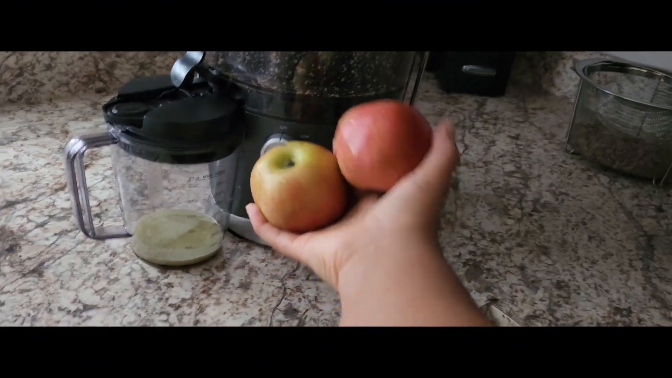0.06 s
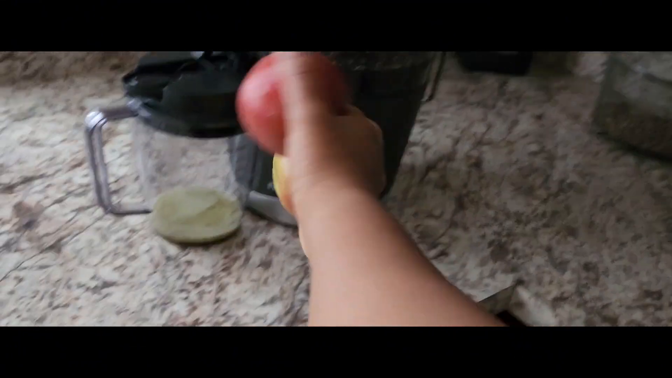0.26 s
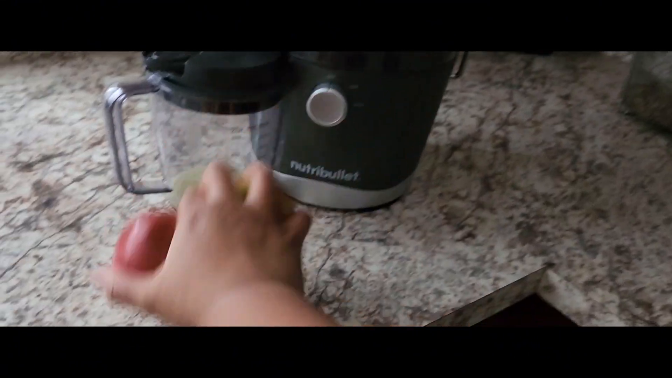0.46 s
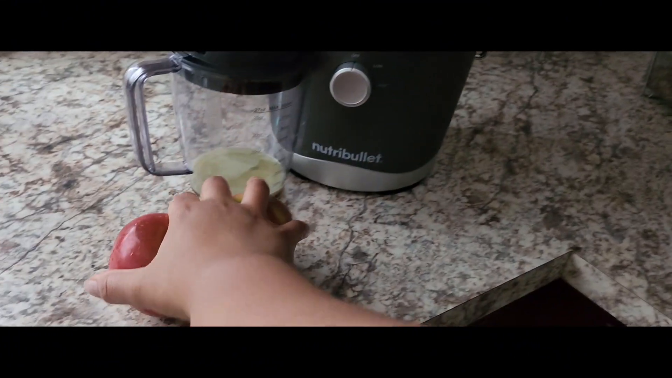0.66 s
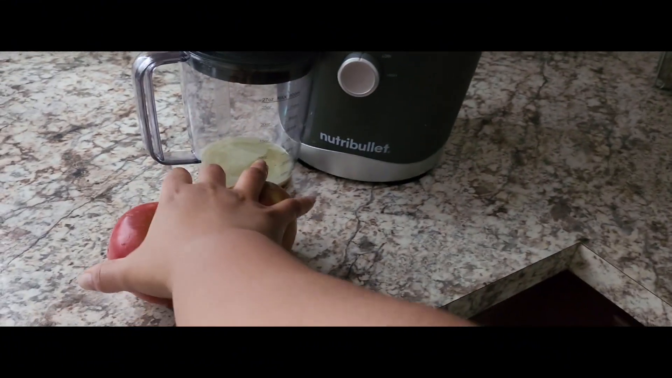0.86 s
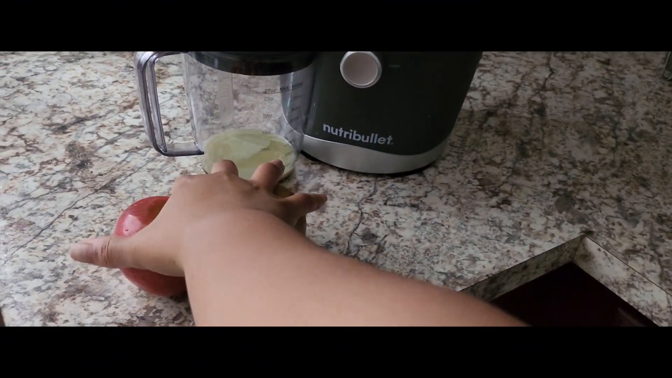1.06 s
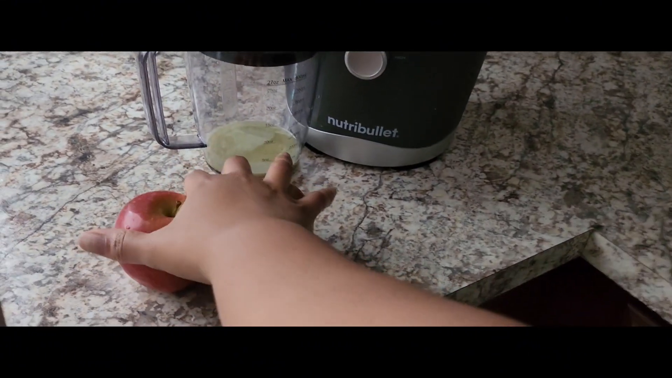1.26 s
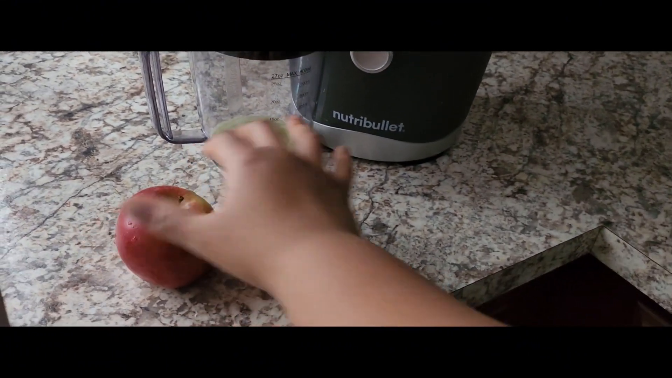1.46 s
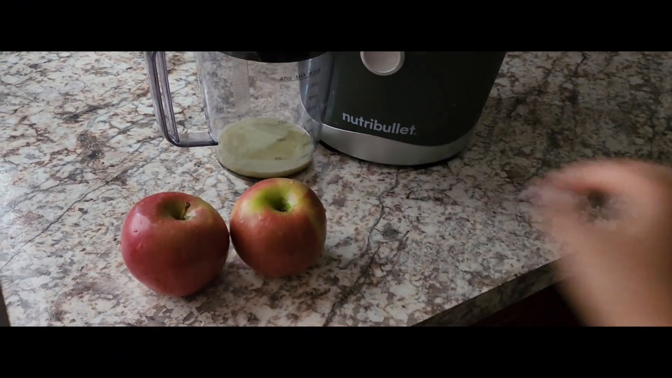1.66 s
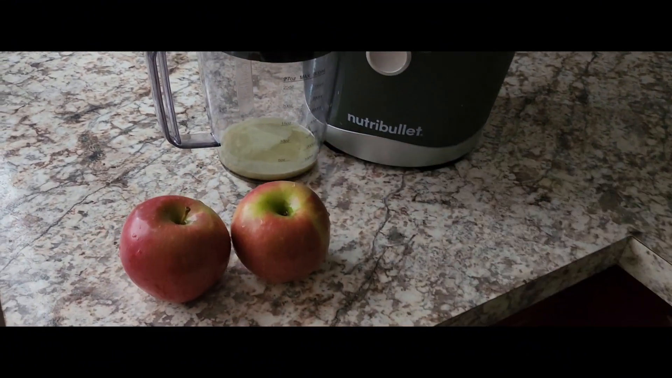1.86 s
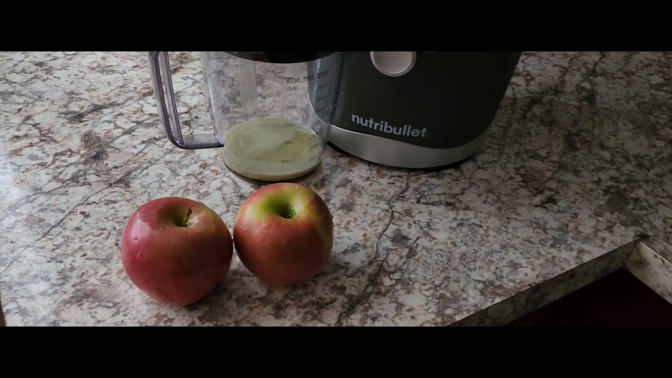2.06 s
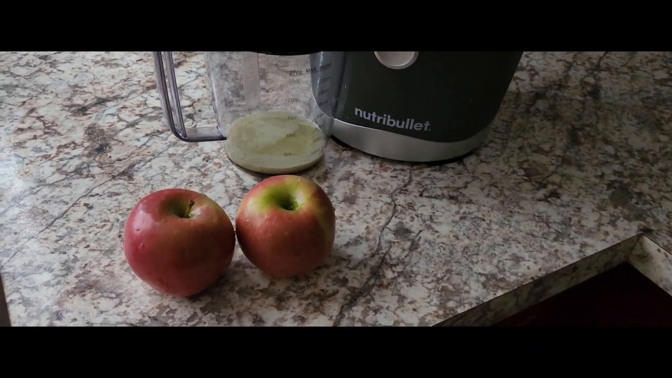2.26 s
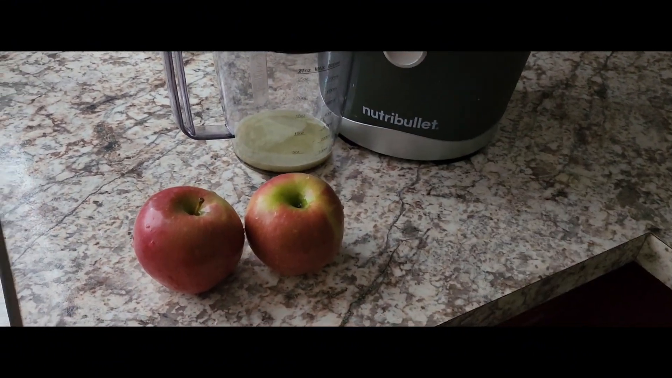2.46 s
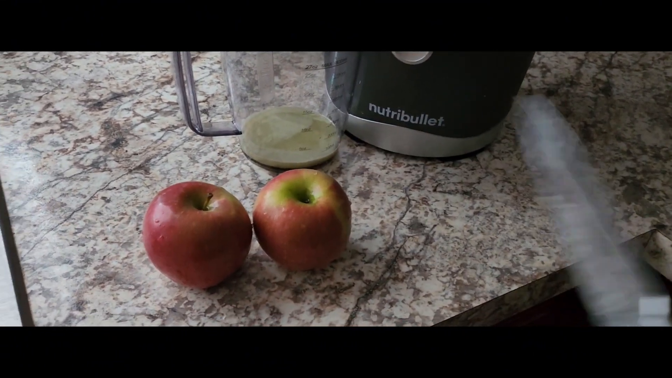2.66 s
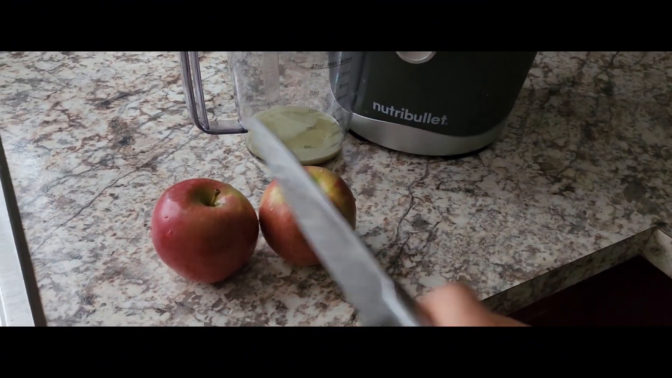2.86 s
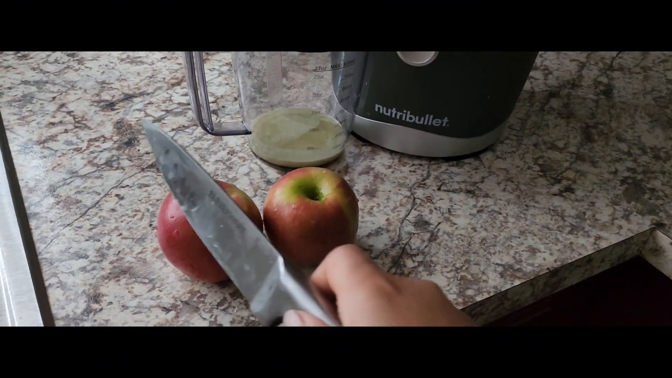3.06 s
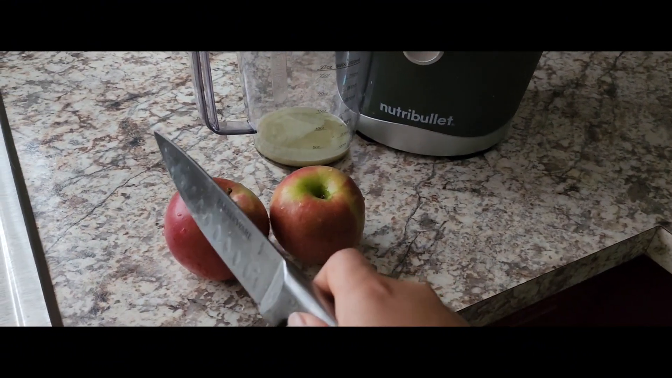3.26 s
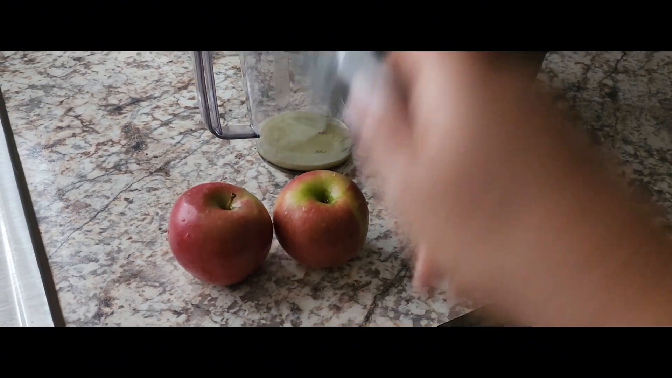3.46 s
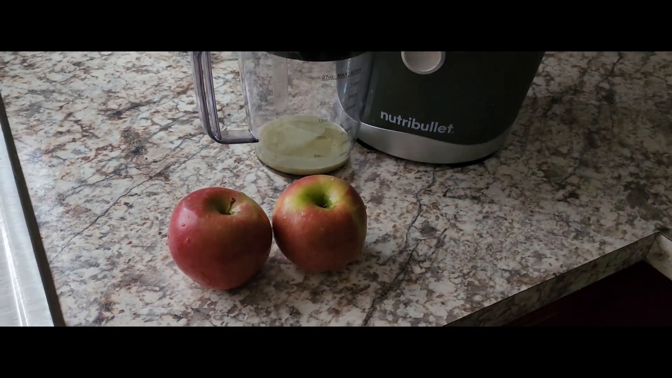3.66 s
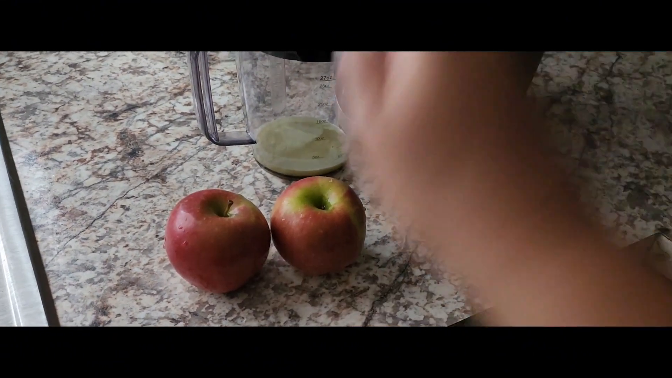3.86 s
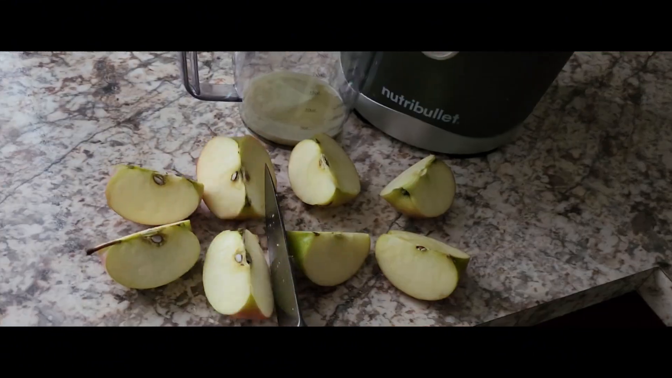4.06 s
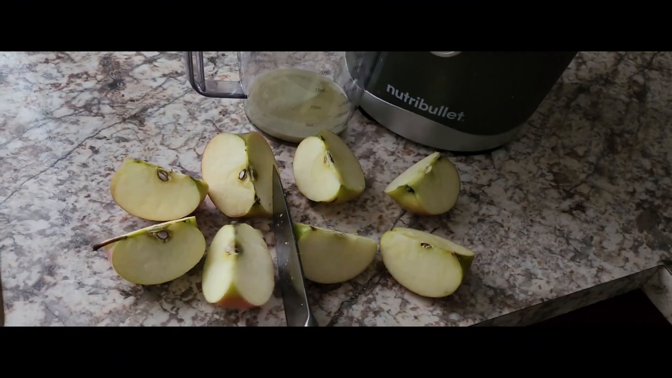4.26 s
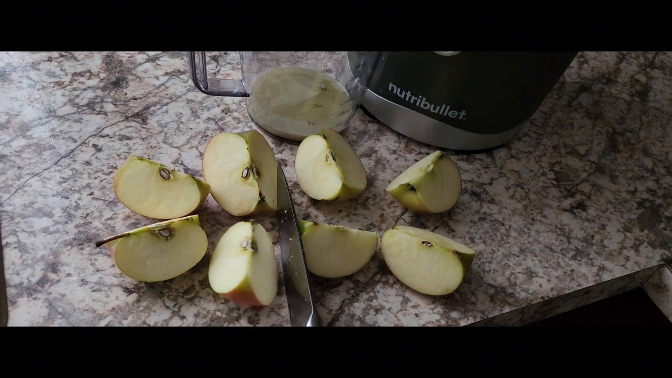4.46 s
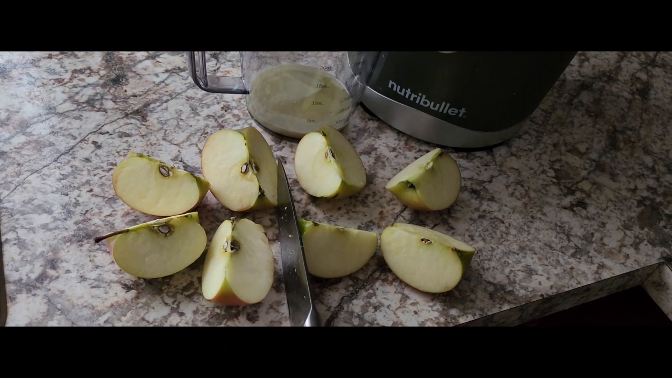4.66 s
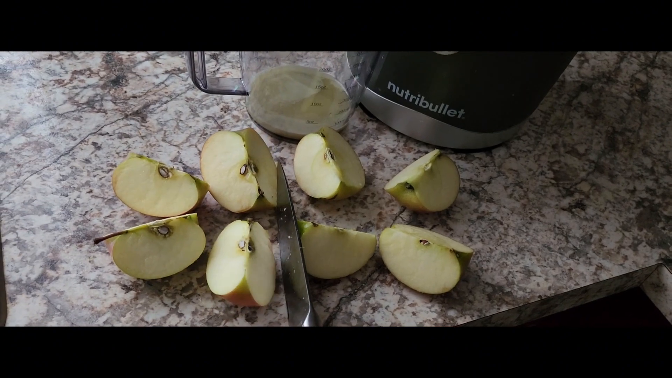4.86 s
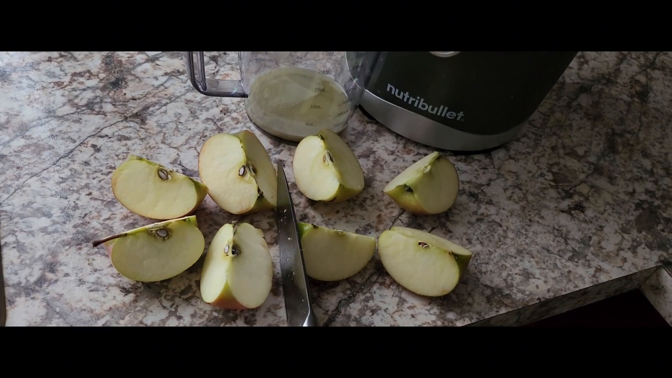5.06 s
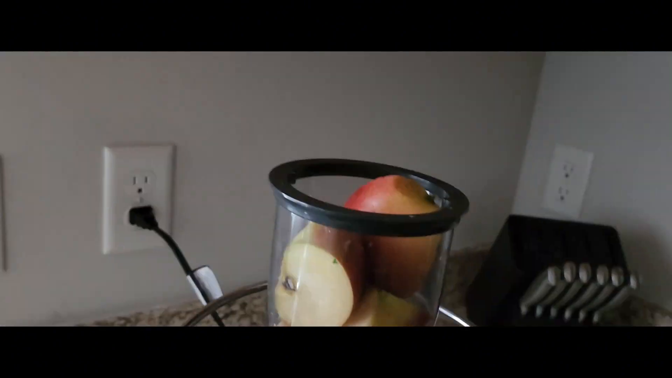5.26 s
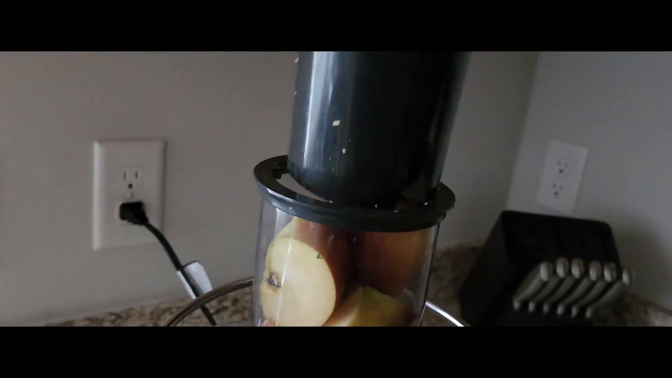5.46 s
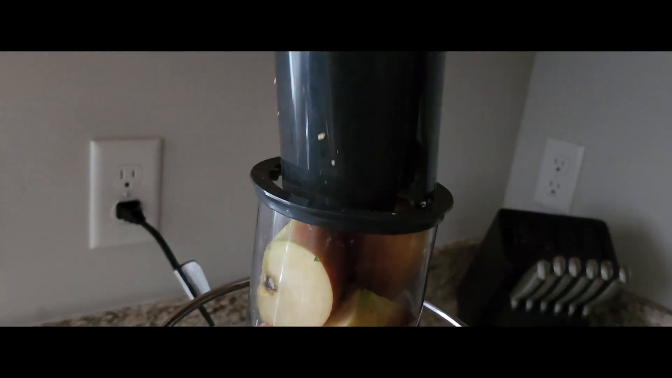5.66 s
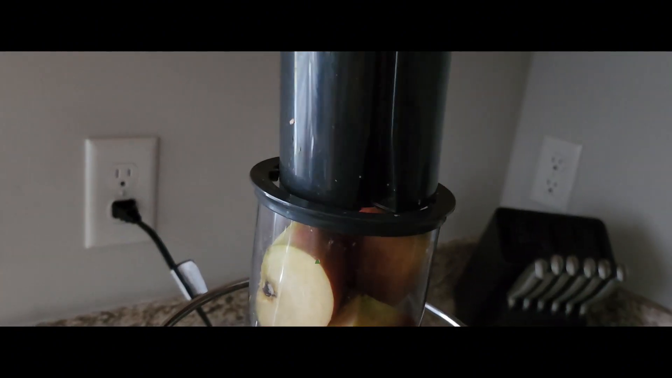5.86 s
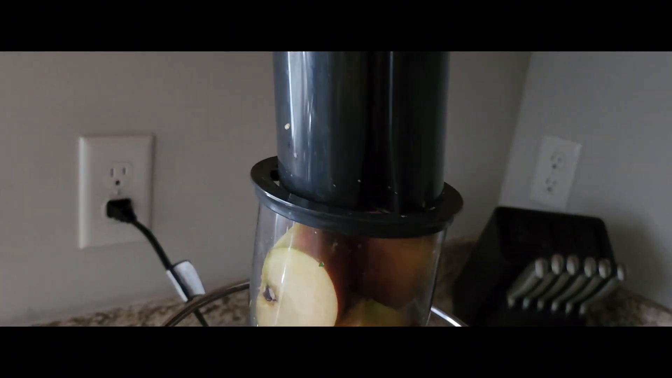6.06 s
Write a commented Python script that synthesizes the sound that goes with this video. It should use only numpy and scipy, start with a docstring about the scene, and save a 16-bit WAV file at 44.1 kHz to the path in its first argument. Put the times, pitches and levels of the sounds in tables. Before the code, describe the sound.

Close in a small, lively kitchen with low ventilation rumble, two apples land in a heavy, clustered thud that rattles a plastic jug. One rolls softly, with small finger taps. A knife scrapes out of a wooden block with a faint steel ring. After a pause a hard blow hits the counter, and the sound cuts abruptly to a loud juicer humming, whining and tearing apple.

```python
"""Ventilation rumbles under a faint hiss; two apples land on a stone counter and shake a plastic jug.
One rolls, a knife is drawn from its block, and a hard blow on the counter rings the room.
The scene then cuts to a running juicer: basket hum, motor whine, rushing air, apple on the grater.
Struck bodies are damped sines and decaying noise; friction and air are coloured noise;
the motor is sines locked to the shaft."""
import sys
import numpy as np
from scipy import signal
from scipy.fft import rfft, irfft
from scipy.io import wavfile
from scipy.ndimage import uniform_filter1d

SR = 44100
rng = np.random.default_rng(int(sys.argv[2]) if len(sys.argv) > 2 else 0)


def to_wav(sig):
    """Store sig (one row per channel, or 1-D mono) as 16-bit WAV at the path in sys.argv[1].

    Samples outside -1..1 are clipped; the rate is SR.
    """
    pcm = np.clip(np.atleast_2d(sig), -1, 1) * 32767
    pcm = np.round(pcm).astype(np.int16)
    wavfile.write(sys.argv[1], SR, pcm.T)  # frames by channels


N = 269451
T = np.arange(N) / SR
RING_T = T[:SR]  # one second, for decays and responses
JUICER_S = 5.206  # cut to the juicer


def undb(db):
    """Decibels to gain."""
    return 10 ** (np.asarray(db) / 20)


def unit(x):
    """Scale to rms 1."""
    return x / np.sqrt(np.mean(x ** 2))


def pan(db):
    """Left and right gains for a left-minus-right level in dB."""
    return undb(np.array([[db], [-db]]) / 2)


def on_log(hz, points):
    """Read (Hz, value) points on a logarithmic frequency axis."""
    f, value = np.transpose(points)
    return np.interp(np.log(hz + 1), np.log(f), value)


def convolve(x, response):
    """Pass a sound through a response, keeping its length."""
    return signal.fftconvolve(np.atleast_2d(x), np.atleast_2d(response), axes=1)[:, :x.shape[-1]]


def colour(x, points, size=8192):
    """Minimum-phase filter with the given spectrum; white noise keeps its power."""
    gain = unit(undb(on_log(np.fft.rfftfreq(size, 1 / SR), points)))
    # folding the cepstrum makes the response causal
    cepstrum = irfft(np.log(gain))
    cepstrum[1:size // 2] *= 2
    cepstrum[size // 2 + 1:] = 0
    return convolve(x, irfft(np.exp(rfft(cepstrum))))


def diffuse(size, apart_hz=680):
    """Stereo white noise: alike in the bass, unrelated in the treble."""
    alike = 1 / (1 + (np.fft.rfftfreq(size, 1 / SR) / apart_hz) ** 4)
    mid, side = rfft(rng.standard_normal((2, size)))
    mid = mid * np.sqrt((1 + alike) / 2)
    side = side * np.sqrt((1 - alike) / 2)
    return irfft(np.array([mid + side, mid - side]), size)


def wander(rate_hz):
    """Smoothed random steps with a spread near 1."""
    hold = max(int(SR / rate_hz), 2)
    steps = np.repeat(rng.standard_normal(N // hold + 1), hold)
    return unit(uniform_filter1d(steps, hold)[:N])


def fade(t60_s):
    """Exponential decay by 60 dB in t60_s seconds."""
    return np.exp(-np.log(1000) * RING_T / t60_s)


def swell(start_s, attack_s, hold_s, t60_s):
    """Envelope that rises linearly, holds and dies away exponentially."""
    rise = np.clip((T - start_s) / attack_s, 0, 1)
    released_s = np.maximum(T - start_s - attack_s - hold_s, 0)
    return rise * np.exp(-np.log(1000) * released_s / t60_s)


def ring(modes):
    """Damped sines of a struck body."""
    return sum(undb(db) * fade(t60_s) * np.sin(2 * np.pi * hz * RING_T) for hz, db, t60_s in modes)


def friction(grain_db, grain_hz):
    """Noise broken into tiny slips of uneven strength."""
    return unit(diffuse(N) * undb(grain_db * wander(grain_hz)))


def add(out, start_s, sound):
    """Mix a sound in at a time."""
    start = int(start_s * SR)
    out[:, start:start + sound.shape[-1]] += sound[..., :N - start]


# Blows on the counter. Each row: start in seconds, level in dB, contact low-pass in Hz, drive high-pass
# in Hz, gain of the counter modes in dB, left minus right in dB, jug clatter in dB, jug ringing
# relative to its clatter in dB.
BLOW_ROWS = [(0.5053, -5, 303, 30, 2, -2.5, -38, -12.5), (0.5126, -17, 1400, 26, -10.5, 7.5, -41, -8.5),
             (0.5169, -1.5, 135, 20, 5, 4.5, -35, -12), (0.527, -15, 1108, 30, -3.5, -2, -25.5, -3.5),
             (0.5352, -2.5, 181, 18, 0, -2.5, -22.5, -3.5), (3.9539, -23.5, 220, 80, -1, -4, -43.5, -15),
             (3.9987, -4, 1796, 120, -3, -3.5, -35.5, -29.5), (4.0096, -13, 2300, 400, -10, 0, -35, -27.5)]
# Modes of counter and cabinet. Each row: pitch in Hz, level in dB, t60 in seconds.
COUNTER_MODES = [(62.3, -28.5, 0.23), (104, -6.5, 0.12), (190, -12, 0.067), (299.6, -14.5, 0.4),
                 (373.2, -16, .22), (497.8, -13, 0.27), (680, -15.5, 0.15), (817, -10.5, 0.034),
                 (1180, -9, .05)]
# Spectrum of the slab's dense short-lived modes. Each row: frequency in Hz, relative level in dB.
SLAB_SPECTRUM = [(30, -20.5), (70, -7), (130, -3.5), (240, 4), (450, 4), (620, 1), (820, -2), (1100, -1),
                 (1450, -7), (2100, -15), (2500, -9.5), (3300, -13.5), (4500, -10), (8000, -13.5),
                 (16000, -5)]


def counter(slab_t60_s=0.13, push_db=21):
    """Blows push the slab and ring its modes; soft fruit passes only lows, a light blade few of them."""
    out = np.zeros((2, N))
    # alternating signs make neighbours swing against each other: little is left below the lowest
    modes = sum((-1) ** k * ring([mode]) for k, mode in enumerate(COUNTER_MODES))
    for start_s, db, contact_hz, lowest_hz, modes_db, pan_db, _, _ in BLOW_ROWS:
        slab = diffuse(SR) * fade(slab_t60_s)
        slab[:, 0] += undb(push_db)  # the push is one impulse
        body = undb(modes_db) * modes - colour(slab, SLAB_SPECTRUM)
        body = signal.lfilter(*signal.butter(1, lowest_hz, "high", fs=SR), body)
        contact = signal.butter(2, min(contact_hz, SR / 3), fs=SR)
        add(out, start_s, undb(db) * pan(pan_db) * signal.lfilter(*contact, body))
    return out


# Modes of the jug. Each row: pitch in Hz, level in dB, t60 in seconds.
JUG_MODES = [(1680, -13.5, 0.085), (2210, -26.5, .2), (2800, -13, 0.14), (2800, -9, 0.087),
             (4030, -13.5, 0.24), (4330, -34.5, 0.36), (5512, -17.5, 0.27), (5620, -17, 0.19),
             (11700, -11, 0.082)]
# Spectrum of the plastic clatter. Each row: frequency in Hz, relative level in dB.
CLATTER_SPECTRUM = [(40, -21), (300, -1.5), (600, 6.5), (1200, 4.5), (1900, 4), (3500, -5.5), (7000, -4.5),
                    (10000, -9), (12500, -3), (16000, -15)]


def jug(clatter_t60_s=0.15, detune=0.014, bounces=3):
    """Plastic chatters at every blow and bounces after the apples; each contact detunes the modes."""
    contacts = [(start_s, db, ring_db) for start_s, *_, db, ring_db in BLOW_ROWS]
    bounce_s, gap_s, gap_shrink = 0.566, 0.016, 0.58
    bounce_db, bounce_ring_db = -34, 6.5
    for k in range(bounces):
        contacts.append((bounce_s, bounce_db, bounce_ring_db))
        bounce_s += gap_s * gap_shrink ** k
    out = np.zeros((2, N))
    for start_s, db, ring_db in contacts:
        rings = []
        for chances in rng.standard_normal((2, len(JUG_MODES))):  # left, right
            loaded = [(hz * (1 + detune * chance), level_db, t60_s)
                      for (hz, level_db, t60_s), chance in zip(JUG_MODES, chances)]
            rings.append(ring(loaded))
        clatter = colour(diffuse(SR) * fade(clatter_t60_s), CLATTER_SPECTRUM)
        add(out, start_s, undb(db) * (clatter + undb(ring_db) * np.array(rings)))
    return out


# Spectrum of the apple on stone. Each row: frequency in Hz, relative level in dB.
ROLL_SPECTRUM = [(40, -33), (75, 3.5), (102, 6.5), (135, -4.5), (180, -8.5), (300, -16), (600, -28),
                 (2000, -46), (6000, -50.5), (9000, -60)]


def rolling_apple(level_db=-35):
    """An apple rolls under the hand: a swell of low noise."""
    envelope = swell(start_s=0.98, attack_s=0.045, hold_s=0.115, t60_s=0.22)
    return colour(undb(level_db) * envelope * diffuse(N), ROLL_SPECTRUM)


# Spectrum of palm on apple skin. Each row: frequency in Hz, relative level in dB.
SKIN_SPECTRUM = [(500, -12.5), (1800, 2), (3000, -2.5), (4900, -0.5), (5700, 3.5), (6800, -14.5),
                 (10000, -17), (14000, -7)]


def palm(level_db=-69.5):
    """The palm brushes the apple skins: a faint swell of noise with a slow release."""
    envelope = swell(start_s=1.1, attack_s=0.12, hold_s=0.29, t60_s=3.3)
    return colour(undb(level_db) * envelope * diffuse(N), SKIN_SPECTRUM)


# Pulls of the knife. Each row: start in seconds, hold in seconds, blade hiss in dB, wood in dB.
PULL_ROWS = [(1.881, 0.11, -48, -38), (1.932, 0.007, -45, -29.5), (2.102, 0.012, -59, -40.5),
             (2.228, 0.02, -60.5, -55)]
# Spectrum of the blade hiss. Each row: frequency in Hz, relative level in dB.
BLADE_SPECTRUM = [(100, -44), (700, -4), (1150, 13.5), (1350, -2), (1650, 15.5), (1950, 7), (2350, 3.5),
                  (3400, -8), (4050, -2), (4450, 1), (4900, 0), (7400, -3), (10000, -6.5), (16000, -3)]
# Modes of the blade. Each row: pitch in Hz, level in dB, t60 in seconds.
STEEL_MODES = [(1561, -12, 0.54), (2298, -17.5, 0.54), (4455, -14.5, 0.15), (6620, -22, 0.15)]
# Spectrum of the wooden block. Each row: frequency in Hz, relative level in dB.
BLOCK_SPECTRUM = [(50, -12.5), (100, 9), (160, 7), (330, -7.5), (490, 8), (650, -10.5), (900, -6),
                  (1300, -16), (1650, -26), (2000, -24), (2350, -33.5), (3000, -29.5), (8000, -53)]


def knife(attack_s=0.0043, blade_t60_s=0.19, wood_t60_s=0.27):
    """The blade scrapes along its wooden slot; the slips ring the steel and shake the block."""
    blade = sum(undb(db) * swell(s, attack_s, hold_s, blade_t60_s) for s, hold_s, db, _ in PULL_ROWS)
    wood = sum(undb(db) * swell(s, attack_s, hold_s, wood_t60_s) for s, hold_s, _, db in PULL_ROWS)
    scrape = blade * friction(grain_db=0.5, grain_hz=860)
    # each mode response has unit energy before its level
    steel = sum(undb(db) * unit(ring([(hz, 0, t60_s)])) for hz, db, t60_s in STEEL_MODES) / np.sqrt(SR)
    slot = colour(wood * friction(grain_db=3.5, grain_hz=400), BLOCK_SPECTRUM)
    return colour(scrape, BLADE_SPECTRUM) + convolve(scrape, steel) + slot


# Taps of fingers and fruit. Each row: start in seconds, level in dB, pitch in Hz, t60 in seconds,
# tick relative to the level in dB, tick centre in Hz.
TAP_ROWS = [(1.082, -61, 3500, .01, 14, 7000), (1.207, -53, 1070, 0.0081, -3, 2200),
            (1.349, -27.5, 570, 0.014, 7, 900), (1.666, -46, 1780, 0.015, 5.5, 3300),
            (2.781, -52, 3600, 0.0046, 8.5, 5300)]


def taps(tick_t60_s=0.013, tick_q=2.9):
    """Small taps: one damped sine and a broad noise tick."""
    out = np.zeros((2, N))
    for start_s, db, hz, t60_s, tick_db, tick_hz in TAP_ROWS:
        tick = signal.lfilter(*signal.iirpeak(tick_hz, tick_q, fs=SR), diffuse(SR) * fade(tick_t60_s))
        add(out, start_s, undb(db) * (ring([(hz, 0, t60_s)]) + undb(tick_db) * tick))
    return out


def partial(phase, waver_db, waver_hz=12, waver_rad=0.14, apart_rad=0.44):
    """A machine tone whose reflections make it waver differently left and right."""
    phase = phase + rng.uniform(0, 2 * np.pi)
    sides = []
    for side in (-1, 1):
        level = undb(waver_db * wander(waver_hz))
        sides.append(unit(level * np.sin(phase + side * apart_rad + waver_rad * wander(waver_hz))))
    return np.array(sides)


# Commutator whine and its lower octave. Each row: multiple of the shaft, level in dB, left minus right
# in dB, waver in dB, lift on the resonance in dB.
WHINE_ROWS = [(36, -31.5, 4.5, 0.5, 6.5), (18, -40, -16.5, 1, 3)]
# Narrow housing resonance met by each whine. Each row: centre in Hz, width in Hz.
WHINE_PEAKS = [(7590, 55), (3777, 6)]
# Other shaft harmonics. Each row: multiple of the shaft, level in dB, left minus right in dB.
ORDER_ROWS = [(2, -52.5, 21.5), (3, -34.5, 10), (4, -45, -8), (5, -34, -10.5), (6, -41.5, -7), (7, -47, 4),
              (9, -39, -8.5), (12, -41, -3), (14, -51.5, -17), (19, -47, -14), (35, -40.5, -5),
              (37, -53, 7), (53, -49, -3), (54, -47, 13)]
# Fixed-pitch tones of the vibrating housing. Each row: pitch in Hz, level in dB.
HOUSING_ROWS = [(102.3, -40.5), (328.4, -40), (446.8, -44), (834.4, -42), (2498, -45.5), (4000, -50),
                (4635, -51), (5394, -44.5), (6691, -57)]


def motor():
    """The unbalanced basket hums once a turn; commutator whines; bearings add harmonics."""
    # the shaft recovers from a sag towards its free speed
    free_hz, sag_hz, recover_s = 211.05, 3.8, 0.34
    speed_hz = free_hz - sag_hz * np.exp(-np.maximum(T - JUICER_S, 0) / recover_s)
    shaft = 2 * np.pi * np.cumsum(speed_hz) / SR
    # the hum holds, then eases as the basket clears
    hum_db, eases_s, ease_db_per_s = -15, 5.83, 7
    hum = undb(hum_db - ease_db_per_s * np.maximum(T - eases_s, 0))
    out = hum * unit(np.sin(shaft)) * pan(1.37)
    for (order, db, pan_db, waver_db, lift_db), (hz, width_hz) in zip(WHINE_ROWS, WHINE_PEAKS):
        closeness = 1 / (1 + (2 * (order * speed_hz - hz) / width_hz) ** 2)
        tone = partial(order * shaft, waver_db, apart_rad=0.66)
        out += undb(db + lift_db * closeness) * pan(pan_db) * tone
    for order, db, pan_db in ORDER_ROWS:
        out += undb(db) * pan(pan_db) * partial(order * shaft, waver_db=6.5)
    for hz, db in HOUSING_ROWS:
        out += undb(db) * unit(undb(4.7 * wander(14)) * np.sin(2 * np.pi * hz * T))
    return out, shaft


# Bites into apple. Each row: start in seconds, hold in seconds, rasp in dB, thump in dB.
BITE_ROWS = [(5.429, 0.015, -21, -22), (5.515, 0.012, -23.5, -38), (5.645, 0.049, -29.5, -46),
             (5.73, 0.026, -31, -48), (5.942, 0.055, -32.5, -50)]
# Spectrum of torn apple. Each row: frequency in Hz, relative level in dB.
PULP_SPECTRUM = [(40, -29), (100, -3), (170, -7), (480, -7.5), (680, 7.5), (900, -4.5), (1150, -4.5),
                 (1700, -10), (5000, -21), (12000, -31)]


def grater(grind_db=-39, attack_s=0.0094, rasp_t60_s=0.19, thump_t60_s=0.18):
    """Teeth grind steadily; each bite rasps louder and jolts the housing on its feet."""
    bites = sum(undb(db) * swell(s, attack_s, hold_s, rasp_t60_s) for s, hold_s, db, _ in BITE_ROWS)
    jolt = sum(undb(db) * swell(s, attack_s, hold_s, thump_t60_s) for s, hold_s, _, db in BITE_ROWS)
    load = undb(grind_db) + bites
    thump_hz, width_hz = 96.8, 34
    band_hz = [thump_hz - width_hz / 2, thump_hz + width_hz / 2]
    rumble = unit(signal.sosfilt(signal.butter(2, band_hz, "band", fs=SR, output="sos"), diffuse(N)))
    return colour(load * friction(grain_db=4.0, grain_hz=620), PULP_SPECTRUM) + jolt * rumble


# Spectrum of air and spray in the basket. Each row: frequency in Hz, relative level in dB.
AIR_SPECTRUM = [(30, -16), (100, 0.5), (350, -3), (900, 1), (1600, -3.5), (2500, -1.5), (3200, -5),
                (4500, -3), (7300, 0), (8300, -4), (9600, -10), (11500, -5), (13500, -7), (16000, -6)]
# Resonances of the bowl. Each row: centre in Hz, width in Hz, level in dB.
BOWL_PEAKS = [(686, 50, -32), (2600, 22, -55.5), (3940, 200, -36.5), (5440, 40, -31), (11430, 200, -40)]


def rushing_air(shaft, level_db=-21.0, throb=0.1, flutter_db=0.2):
    """Air noise throbs with each turn and rings the bowl."""
    swirl = (1 + throb * np.sin(shaft)) * undb(flutter_db * wander(30))
    air = undb(level_db) * colour(diffuse(N) * swirl, AIR_SPECTRUM) * pan(1.0)
    for hz, width_hz, db in BOWL_PEAKS:
        peak = signal.iirpeak(hz, hz / width_hz, fs=SR)
        air += undb(db) * unit(signal.lfilter(*peak, diffuse(N) * swirl))
    return air


def casing(x, echo_db=-5.0, t60_s=0.06):
    """Short echoes inside the plastic casing carve fine peaks and dips into a sound."""
    echoes = unit(diffuse(SR) * fade(t60_s)) / np.sqrt(SR)
    return (x + undb(echo_db) * convolve(x, echoes)) / np.hypot(1, undb(echo_db))


def juicer():
    """Motor tones, air heard through the casing, and the grater tearing at fruit."""
    tones, shaft = motor()
    return tones + casing(rushing_air(shaft)) + grater()


# Spectrum of the ventilation. Each row: frequency in Hz, relative level in dB.
VENT_SPECTRUM = [(25, -13), (40, 0), (54, 0), (114, -7), (145, -2), (205, 0), (325, -10), (420, -7),
                 (572, -14), (739, -15.5), (1400, -40), (2400, -58), (6500, -75), (16000, -80)]
# Spectrum of the hiss. Each row: frequency in Hz, relative level in dB.
HISS_SPECTRUM = [(300, -1.5), (1800, 3), (2800, -4.5), (4200, -4), (8000, -12.5), (16000, -8)]


def background(quieter_s=4.0):
    """Ventilation rumbles unevenly under a faint hiss; both step down slightly at quieter_s."""
    vent = undb(np.where(T < quieter_s, -47, -50))
    hiss = undb(np.where(T < quieter_s, -74, -76))
    rumble = colour(diffuse(N), VENT_SPECTRUM) * undb(0.48 * wander(10))
    return vent * rumble + hiss * colour(diffuse(N), HISS_SPECTRUM)


# Reverberation of the room. Each row: band centre in Hz, t60 in seconds.
ROOM_BANDS = [(80, 0.26), (300, 0.5), (1000, 0.51), (4500, 0.58), (6500, 0.44), (16000, 0.4)]


def kitchen(x, wet_db, build_s=0.008):
    """Dense reflections from walls and cupboards; each band has its own decay, the bass shortest."""
    noise, hz = rfft(diffuse(SR)), np.fft.rfftfreq(SR, 1 / SR)
    tail = 0
    for centre_hz, t60_s in ROOM_BANDS:
        share = on_log(hz, [(f, float(f == centre_hz)) for f, _ in ROOM_BANDS])
        tail = tail + irfft(noise * share, SR) * fade(t60_s)
    tail = tail * (1 - np.exp(-(RING_T / build_s) ** 2))
    return x + undb(wet_db) * convolve(x, unit(tail) / np.sqrt(SR))


def scene():
    """Counter sounds over the ventilation, then an abrupt change to the running juicer."""
    before = kitchen(counter(), wet_db=-5.5) + kitchen(jug(), wet_db=-12.0)
    before += kitchen(rolling_apple() + palm() + knife(), wet_db=-10.5)
    before += kitchen(taps(), wet_db=-12)
    return np.where(T < JUICER_S, before + background(), juicer())


def record(dry, low_cut_hz=34, top_hz=15720):
    """Drop the deepest bass, clip at full scale and cut the top steeply."""
    lean = signal.sosfilt(signal.butter(3, low_cut_hz, "high", fs=SR, output="sos"), dry)
    top_cut = signal.ellip(10, 0.1, 70, top_hz, fs=SR, output="sos")
    return signal.sosfilt(top_cut, np.clip(lean, -1, 1))


dry = scene()
out = record(dry)
to_wav(out)
```